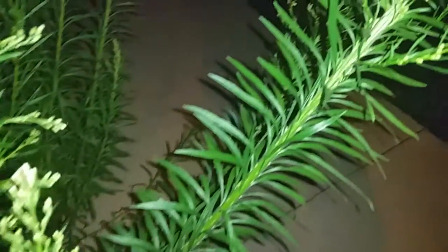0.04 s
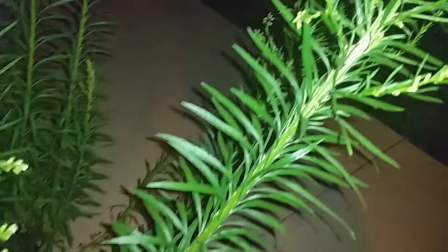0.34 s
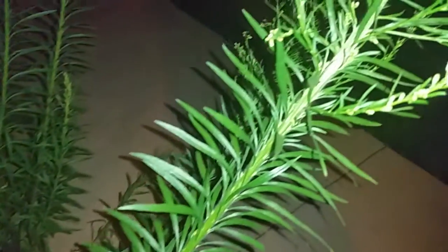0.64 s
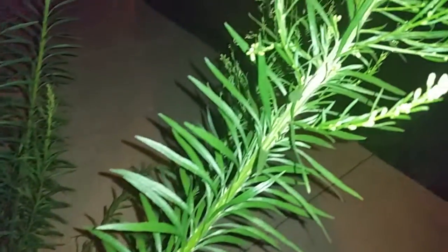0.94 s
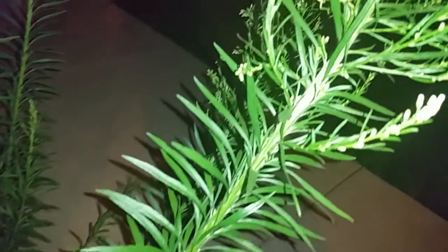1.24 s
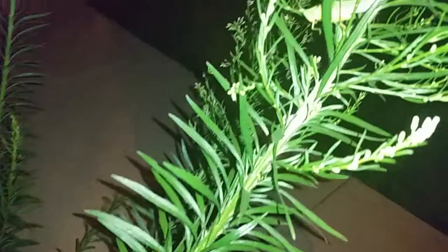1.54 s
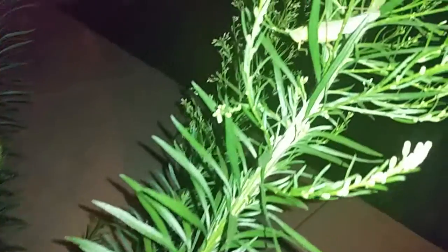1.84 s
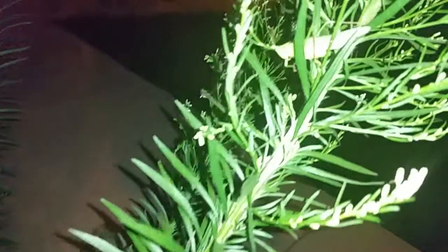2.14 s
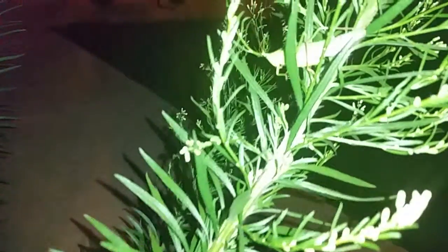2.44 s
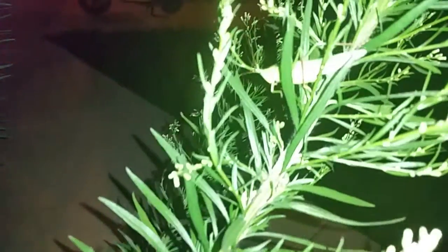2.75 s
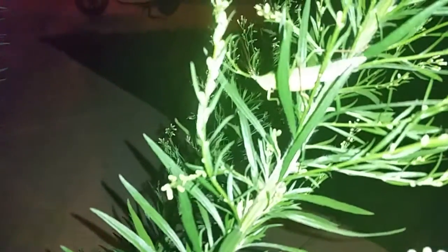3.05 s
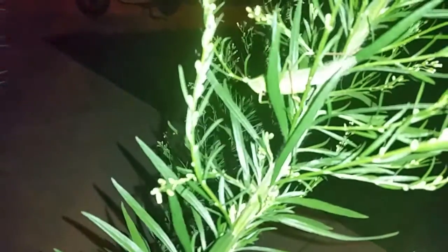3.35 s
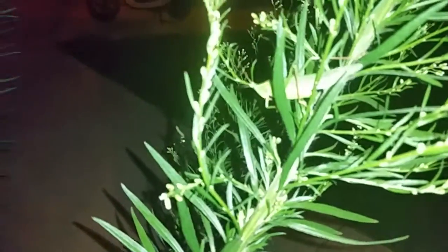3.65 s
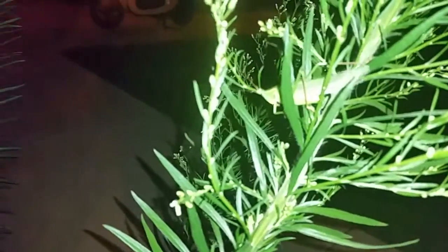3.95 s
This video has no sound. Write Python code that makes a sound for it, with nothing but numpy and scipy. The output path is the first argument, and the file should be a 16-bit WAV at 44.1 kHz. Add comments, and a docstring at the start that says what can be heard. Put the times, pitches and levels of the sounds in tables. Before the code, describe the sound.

Close katydid pulsing in a rapid, shrill, even rhythm at night, with far crickets and traffic.

```python
"""A katydid rasps on a plant at night, a hand's width from a slowly moving pair of microphones.
Eleven times a second its wings open with a faint scrape and close loudly: a scraper runs over a file
of teeth, each ringing the wing, and springs off with a snap. Leaves and ground scatter the song.
Behind it, far crickets shrill to the left and distant traffic rumbles and fades. A far car swells by
early on; later a few small chirps fall through the crickets' band."""
import sys
import numpy as np
from scipy import signal
from scipy.fft import rfft, irfft
from scipy.io import wavfile
from scipy.ndimage import uniform_filter1d, minimum_filter1d

SR = 44100
rng = np.random.default_rng(int(sys.argv[2]) if len(sys.argv) > 2 else 0)


def pcm_store(signal):
    """Save signal as 16-bit PCM."""
    levels = np.round(np.clip(np.atleast_2d(signal), -1, 1) * 32767)
    wavfile.write(sys.argv[1], SR, levels.astype(np.int16).T)


N = 176400
FFT_SIZE = 2 ** 18
TIME = np.arange(N) / SR
HZ = np.maximum(np.arange(FFT_SIZE // 2 + 1) * SR / FFT_SIZE, 1)

# Levels in the tables are relative: gains and envelopes further down act on them.
# closing strokes of the wings: t/s, length/s, level/dB, final snap above that level/dB
CLOSING_STROKES = [(-0.009, 0.0235, -15.0, 8), (0.0782, 0.0233, -15.2, 12), (0.1656, 0.0238, -15.2, 12),
                   (0.2531, 0.0238, -15.6, 12), (0.344, 0.0233, -15.8, 12), (0.4335, 0.0236, -15.1, 12),
                   (0.5204, 0.0238, -14.8, 11), (0.6085, 0.0228, -14.3, 12), (0.6971, 0.0239, -14.2, 11),
                   (0.7839, 0.0239, -14.0, 11), (0.8708, 0.0238, -14.3, 11), (0.9614, 0.0242, -14.9, 13),
                   (1.049, 0.0237, -14.7, 10), (1.1371, 0.023, -14.5, 12), (1.2247, 0.0238, -13.7, 11),
                   (1.315, 0.0234, -14.0, 11), (1.405, 0.0241, -14.2, 11), (1.4934, 0.0232, -14.4, 11),
                   (1.5826, 0.0231, -14.4, 11), (1.6718, 0.0239, -14.0, 11), (1.7624, 0.024, -14.8, 11),
                   (1.8516, 0.0232, -13.7, 7), (1.9416, 0.0236, -13.8, 10), (2.0304, 0.0242, -13.8, 9),
                   (2.1198, 0.0238, -13.7, 8), (2.211, 0.0232, -14.4, 9), (2.2995, 0.0229, -13.6, 10),
                   (2.3919, 0.024, -13.7, 9), (2.4826, 0.024, -14.2, 7), (2.5724, 0.0228, -14.5, 9),
                   (2.6602, 0.0233, -14.5, 7), (2.7471, 0.0245, -14.2, 9), (2.8383, 0.0239, -14.6, 9),
                   (2.9271, 0.0234, -14.4, 9), (3.0154, 0.0238, -14.7, 10), (3.1057, 0.0233, -14.7, 10),
                   (3.1942, 0.024, -14.5, 9), (3.2822, 0.0231, -15.0, 6), (3.371, 0.0239, -15.1, 8),
                   (3.4625, 0.0234, -15.0, 9), (3.5495, 0.0234, -15.8, 10), (3.6392, 0.0232, -15.8, 8),
                   (3.7275, 0.023, -16.1, 8), (3.8145, 0.0231, -16.3, 10), (3.9049, 0.0238, -17.7, 7),
                   (3.9925, 0.0235, -18.0, 8)]
# the scraper's run along the file: share of the stroke, rate/(teeth per s), force/dB
SCRAPER_RUN = [(0, 1900, -7), (.1, 1450, -4.2), (.3, 1380, -1.2), (.55, 1410, .6), (.75, 1370, .4),
               (.9, 1200, -.6), (1, 1000, -2)]
# ring of the wing on closing: f/Hz, level/dB
CLOSING_RING = [(300, -59), (900, -61), (1400, -48), (1900, -56), (2600, -59), (4300, -76.5), (6000, -43.5),
                (7200, -49.5), (8500, -36), (9500, -24.5), (10500, -12), (11800, -0.5), (13000, -3),
                (14400, 4), (15600, -1), (17000, 18.5)]
# the wing's higher modes speak later: f/Hz, delay/s
MODE_LAG = [(9000, 0), (16000, .00032)]
# colour of the low rasp, with a faint tone near 1.4 kHz, the rate of the tooth strikes: f/Hz, level/dB
RASP_COLOUR = [(300, -36), (700, -4), (1000, 0), (1200, -1), (1390, 5.5), (1600, -1.5), (1900, -2),
               (2600, -3), (3600, -2.5), (4500, -9), (7000, -31), (16000, -18)]
# level ride of that rasp: t/s, level/dB
RASP_RIDE = [(0, -5), (1, -1), (2, 0), (3, 2), (3.3, 1), (4, -2)]
# ring of the wing as it snaps free: f/Hz, level/dB
SNAP_RING = [(1000, -65), (4000, -64.5), (5600, -43.5), (7000, -42.5), (8500, -37), (10400, -14.5),
             (11400, -7), (12200, 5), (13000, -7.5), (14000, -4), (16000, -10)]
# opening scrape, catching twice: time ahead of the stroke/s, level/dB
OPENING_ENVELOPE = [(.0003, -19), (.0018, -17), (.0026, -26), (.0036, -13), (.0044, -28), (.007, -32),
                    (.009, -45)]
# ring of the wing on opening: f/Hz, level/dB
OPENING_RING = [(1000, -64), (4500, -39), (6500, -22.5), (8500, -13.5), (10300, -5.5), (13000, -13),
                (15000, -3), (17000, 8)]
# ring of the tick as the wings part: f/Hz, level/dB
PARTING_RING = [(1000, -50), (5000, -30), (7000, -16.5), (8800, -1), (10300, -3), (12000, 3), (16000, -13)]
# the katydid's bearing as the microphones move: t/s, left minus right/dB
SONG_PAN = [(0, -2.4), (.6, -2.2), (1.2, -1.9), (1.7, -1.4), (2.15, 0), (2.6, .4), (3.1, 1.4), (3.6, 2.9),
            (3.9, 5.7)]
# how much sooner the song reaches the left microphone: t/s, lead/microseconds
LEFT_LEAD = [(0, -27), (.17, -18), (.52, 7), (.7, 24), (1.05, 44), (1.67, 61), (2.03, 77), (2.39, 99),
             (2.66, 109), (3.46, 124), (3.64, 124), (3.9, 112)]
# colour of the close sound at each microphone: f/Hz, left/dB, right/dB
MIC_COLOUR = [(497, 3, 4), (1380, 1, -8.5), (4060, -1, -11.5), (6340, 5, -4), (8030, 2.5, -11),
              (9870, 3, -4), (12150, 1.5, 0.5), (12400, -2.5, 3), (13800, -1, 1.5), (17100, 1.5, -4)]
# scatter off leaves, ground and walls: delay/s, t60/s, level/dB
SCATTER_TAILS = [(.001, 0.041, -10.5), (.01, 0.167, -23.5)]
# the scatter is duller than the direct song: f/Hz, level/dB
SCATTER_EQ = [(5000, -7), (7500, 6), (9500, 7.5), (11500, 0), (14500, -2.5), (16000, 0)]
# level ride of the song's lower treble: t/s, level/dB
TREBLE_RIDE = [(0, 10), (.3, 1.5), (.7, -3), (1.5, 0), (2.5, -4.5), (4, -4.5)]
# far cricket choruses: f/Hz, width/Hz, level/dB, left minus right/dB, fade/(dB per s)
CRICKET_BANDS = [(2480, 214, -78, 7.5, 0.5), (2551, 22, -86, 7, 0), (3235, 170, -82, 12, 1),
                 (5118, 120, -75.5, 17.5, -0.5), (5530, 454, -68, 27.5, 1), (6900, 280, -90, 10, 6),
                 (7660, 130, -81, 24, 2.5)]
# level ride of all the choruses: t/s, level/dB
CRICKET_RIDE = [(0, -0.5), (1, -0.5), (2, -2), (3, -4.5), (4, -5.5)]
# traffic rumble: f/Hz, density/(dB per Hz), left-right likeness, left minus right/dB
RUMBLE_SPECTRUM = [(20, -103, 0.45, 8), (33.2, -90, 0.95, -10), (54.7, -78.5, 1, -5),
                   (78.5, -74.5, 0.97, -3), (107, -73, 0.89, 1), (204.4, -82.5, 0.9, -0.5),
                   (320, -94.5, 0.27, 4), (590, -108, 0.58, -1.5), (1990, -135, 0.18, 6)]
# night air with road hiss: f/Hz, density/(dB per Hz), left-right likeness, left minus right/dB
AIR_SPECTRUM = [(98, -105, 0.26, 2), (330, -91.5, 0.87, 1.8), (536, -99, 0.77, 6.3), (1254, -104, 0, 5.5),
                (2060, -114, 0, 0.5), (4540, -123, 0, 7.5), (6600, -123, 0, 31), (8650, -116, 0.44, 13),
                (15400, -115, 0, 4)]
# far engines: f/Hz, width/Hz, level/dB
ENGINE_HUMS = [(55.3, 6.6, -61), (236.5, 13.3, -68.5)]
# level rides of the traffic bed: t/s, rumble and hum/dB, air/dB
TRAFFIC_RIDE = [(0, 4.5, 5.5), (.5, 3, 2), (.9, 2.5, 2), (1.5, 1, 1.5), (2.2, -0.5, -2.5), (3, -2.5, -3),
                (4, -3, -5.5)]
# small falling chirps: t/s, level/dB
CHIRP_CUES = [(1.19, -52), (1.235, -53), (1.42, -56), (1.465, -50), (1.912, -53), (1.945, -54),
              (1.99, -46.5), (2.21, -53.5), (2.251, -45.5), (2.287, -48), (2.56, -54), (2.87, -54)]


def from_db(db):
    """Decibels to gain."""
    return 10 ** (np.asarray(db) / 20)


def along(rows, x):
    """A table's later columns, read where its first column is x."""
    first, *columns = np.transpose(rows)
    return [np.interp(x, first, c) for c in columns]


def across_hz(rows):
    """A table's later columns, spread over the spectrum on a log-frequency axis."""
    first, *columns = np.transpose(rows)
    return [np.interp(np.log(HZ), np.log(first), c) for c in columns]


def panned(db):
    """Left and right gains for a level difference."""
    return from_db(np.array([np.atleast_1d(db), -np.atleast_1d(db)]) / 2)


def minimum_phase(db):
    """An EQ curve that rings only after the strike."""
    cepstrum = irfft(np.log(from_db(db)))
    cepstrum[1:FFT_SIZE // 2] *= 2
    cepstrum[FFT_SIZE // 2 + 1:] = 0
    return np.exp(rfft(cepstrum))


def clicks(times, gains, order=8):
    """Sharp clicks placed between the samples as windowed sinc pulses."""
    out = np.zeros(N)
    index = np.floor(times * SR).astype(int)[:, None] + np.arange(1 - order, order + 1)
    offset = index - times[:, None] * SR
    pulse = gains[:, None] * np.sinc(offset) * np.cos(np.pi * offset / (2 * order)) ** 2
    inside = (index >= 0) & (index < N)
    np.add.at(out, index[inside], pulse[inside])
    return out


def noise(gain):
    """Two unrelated noises with the given spectrum."""
    return irfft(rfft(rng.standard_normal((2, FFT_SIZE))) * gain)[:, :N]


def narrow_noise(hz, width_hz):
    """A stereo band of noise around one pitch; rms 1."""
    band = noise(1 / (1 + ((HZ - hz) / width_hz) ** 2) ** 2)
    return band / band.std()


def closing_teeth(count=60, file_spread=.06, file_db=.7, jitter_db=1.6):
    """Times and forces of the tooth strikes: the scraper slows and slips less evenly towards the end."""
    spacing, height = rng.standard_normal((2, count))  # the same uneven file on every stroke
    share = np.linspace(0, 1, count)
    rate, force_db = along(SCRAPER_RUN, share)
    times, levels = [], []
    for start, length, db, _ in CLOSING_STROKES:
        slip, jitter = rng.standard_normal((2, count))
        teeth_passed = (np.cumsum(rate) - rate[0]) * length / (count - 1)
        near_end = np.minimum(np.arange(count) / teeth_passed[-1], 1) ** 5
        slip_spread = .029 + .134 * near_end  # shares of a tooth gap
        gaps = np.maximum(1 + file_spread * spacing + slip * slip_spread, .75)
        tooth = np.cumsum(gaps) - gaps[0]
        struck_at = np.interp(tooth[tooth < teeth_passed[-1] - 1], teeth_passed, share)
        uneven_db = (file_db * height + jitter_db * jitter)[:len(struck_at)]
        times.append(start + struck_at * length)
        levels.append(db + np.interp(struck_at, share, force_db) + uneven_db)
    return np.concatenate(times), from_db(np.concatenate(levels))


def low_rasp(gain_db=-52, right_db=-15, jitter_db=1.2, peak_share=.64):
    """A soft low rasp, mostly on the left, swells and fades under each closing stroke."""
    swells = np.zeros(N)
    for start, length, _, _ in CLOSING_STROKES:
        peak = from_db(jitter_db * rng.standard_normal())
        swells += np.interp(TIME, start + length * np.array([0, peak_share, 1.4]), [0, peak, 0])
    bearing_db = .65 * along(SONG_PAN, TIME)[0]  # louder as the katydid drifts left
    level = from_db(gain_db + along(RASP_RIDE, TIME)[0] + bearing_db)
    rasp = noise(from_db(across_hz(RASP_COLOUR)[0]))
    return rasp * swells * level * from_db([[0], [right_db]])


def snaps(ahead_s=.0005):
    """One hard click as the scraper springs off the file, just before each stroke ends."""
    start, length, db, snap_db = np.transpose(CLOSING_STROKES)
    return start + length - ahead_s, from_db(db + snap_db)


def opening_teeth(count=32, teeth_per_s=4200):
    """The scraper brushes lightly back over the file ahead of each stroke."""
    start, _, db, _ = np.transpose(CLOSING_STROKES)
    ahead_s = (np.arange(count) + rng.random((len(start), count))) / teeth_per_s
    brush_db, = along(OPENING_ENVELOPE, ahead_s)
    return (start[:, None] - ahead_s).ravel(), from_db(db[:, None] + brush_db).ravel()


def parting_ticks(ahead_s=.0058):
    """The wings part with a tick before each stroke."""
    start, _, db, _ = np.transpose(CLOSING_STROKES)
    return start - ahead_s, from_db(db)


def wing(times, forces, ring, gain_db):
    """Spectrum of strikes that ring the wing and reach each microphone at their own time and level."""
    lead_s = along(LEFT_LEAD, times)[0] / 1e6
    left, right = panned(along(SONG_PAN, times)[0]) * forces
    strikes = np.array([clicks(times - lead_s / 2, left), clicks(times + lead_s / 2, right)])
    lag = np.exp(-2j * np.pi * np.cumsum(along(MODE_LAG, HZ)[0]) * SR / FFT_SIZE)
    return rfft(strikes, FFT_SIZE) * lag * minimum_phase(across_hz(ring)[0] + gain_db)


def scatter_pattern():
    """Frequency response of the dying scatter at one spot, different on each side."""
    scatter = np.zeros((2, N))
    for delay, t60, db in SCATTER_TAILS:
        decay = (TIME >= delay) * from_db(-60 * np.minimum(TIME / t60, 10))
        tail = rng.standard_normal((2, N)) * decay
        scatter += from_db(db) * tail / np.sqrt(np.sum(tail ** 2, axis=1, keepdims=True))
    return rfft(scatter, FFT_SIZE)


def surroundings(song, spots=4, leaf_s=.0002128, leaf_db=-13.5, ground_s=.0058, ground_db=-17):
    """Direct song, a close leaf, a ground echo, and scatter that shifts as the microphones move."""
    leaf = from_db(leaf_db) * np.exp(-2j * np.pi * HZ * leaf_s)
    ground = from_db(ground_db) * np.exp(-2j * np.pi * HZ * ground_s)
    out = irfft(song * (1 + leaf + ground))[:, :N]
    dull = song * minimum_phase(across_hz(SCATTER_EQ)[0])
    position = np.linspace(0, spots - 1, N)
    for spot in range(spots):
        crossfade = np.sqrt(np.maximum(1 - np.abs(position - spot), 0))
        out += crossfade * irfft(dull * scatter_pattern())[:, :N]
    return out


def katydid(treble_hz=8930, treble_width_hz=2140):
    """Wing strokes ring among the leaves; the song's lower treble starts strong and eases back."""
    closing = wing(*closing_teeth(), CLOSING_RING, gain_db=21.5)
    closing += wing(*snaps(), SNAP_RING, gain_db=19)
    opening = wing(*opening_teeth(), OPENING_RING, gain_db=15)
    opening += wing(*parting_ticks(), PARTING_RING, gain_db=-2)
    mic_eq = np.array([minimum_phase(db) for db in across_hz(MIC_COLOUR)])
    song = surroundings((opening + closing) * mic_eq)
    bell = np.exp(-.5 * ((HZ - treble_hz) / treble_width_hz) ** 2)
    treble = irfft(rfft(song, FFT_SIZE) * bell)[:, :N]
    return song + treble * (from_db(along(TREBLE_RIDE, TIME)[0]) - 1)


def crickets(throb_hz=53, throb_db=2.18):
    """Far choruses blur into shrill, throbbing bands."""
    bands = np.zeros((2, N))
    for hz, width, db, pan, fade in CRICKET_BANDS:
        voices = narrow_noise(hz, width)
        throb = from_db(throb_db * narrow_noise(0, throb_hz)[0])
        bands += from_db(db - fade * TIME) * panned(pan) * voices * throb
    return bands * from_db(along(CRICKET_RIDE, TIME)[0])


def diffuse(spectrum):
    """A bed of noise from all round; left-right likeness sets its width at each frequency."""
    db, alike, pan = across_hz(spectrum)
    mid, side = rfft(rng.standard_normal((2, FFT_SIZE))) * np.sqrt([1 + alike, 1 - alike])
    stereo = np.array([mid + side, mid - side]) * panned(pan) * from_db(db)
    return irfft(stereo)[:, :N] * np.sqrt(SR) / 2


def traffic():
    """Distant rumble, engine hum and road hiss fade slowly."""
    rumble_db, air_db = along(TRAFFIC_RIDE, TIME)
    hum = sum(from_db(db) * narrow_noise(hz, width)[0] for hz, width, db in ENGINE_HUMS)
    rumble = from_db(rumble_db) * (diffuse(RUMBLE_SPECTRUM) + hum)
    return rumble + from_db(air_db) * diffuse(AIR_SPECTRUM)


def passing_car(peak_s=.48, spread_s=.24, peak_db=-58.5):
    """A far car goes by in a soft swell of tyre noise."""
    swell = np.exp(-.5 * ((TIME - peak_s) / spread_s) ** 2)
    return from_db(peak_db) * swell * narrow_noise(hz=380, width_hz=220)


def chirps(hz=5117, fall_hz_per_s=6200, width_s=.0087, right_db=-33):
    """Short, nearly pure notes slide down on the left, blurred by distance."""
    notes = np.zeros(N)
    for centre, db in CHIRP_CUES:
        t = TIME - centre
        envelope = np.exp(-.5 * np.minimum((t / width_s) ** 2, 100))
        notes += from_db(db) * envelope * np.sin(2 * np.pi * t * (hz - fall_hz_per_s * t / 2))
    flutter = 1 + .35 * narrow_noise(0, width_hz=150)
    return notes * flutter * from_db([[0], [right_db]])


def scene():
    """The katydid up front, the night behind it."""
    return katydid() + low_rasp() + crickets() + chirps() + traffic() + passing_car()


def record(dry, cutoff_hz=15800, ceiling=.79, limiter_s=.005):
    """The top is cut steeply; a look-ahead limiter eases down the highest strikes."""
    taps = signal.firwin(301, cutoff_hz, fs=SR, window=("kaiser", 6))
    sound = signal.fftconvolve(dry, taps[None], mode="same", axes=1)
    window = int(limiter_s * SR)
    needed_gain = ceiling / np.maximum(np.abs(sound), ceiling)
    held_gain = minimum_filter1d(needed_gain, 2 * window, axis=1)
    return sound * uniform_filter1d(uniform_filter1d(held_gain, window, axis=1), window, axis=1)


dry = scene()
out = record(dry)
pcm_store(out)
```